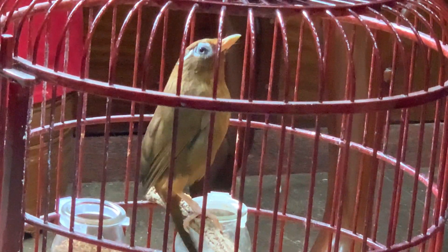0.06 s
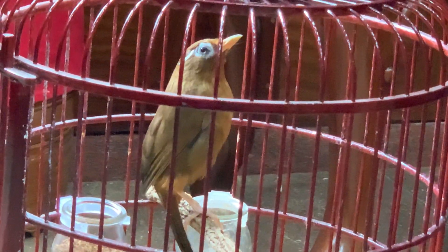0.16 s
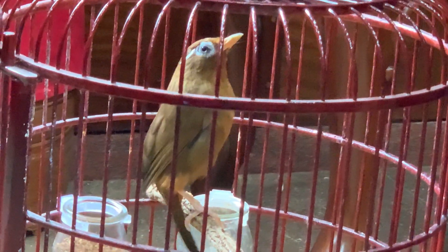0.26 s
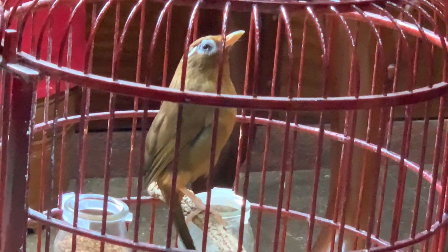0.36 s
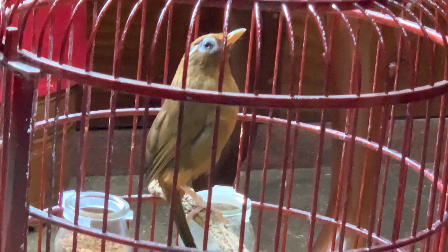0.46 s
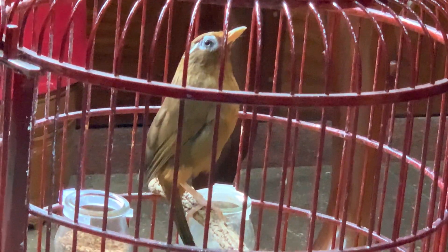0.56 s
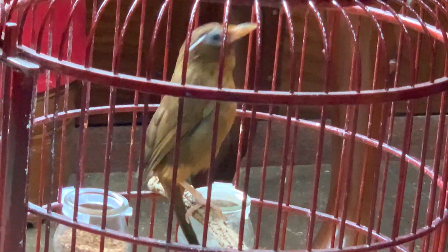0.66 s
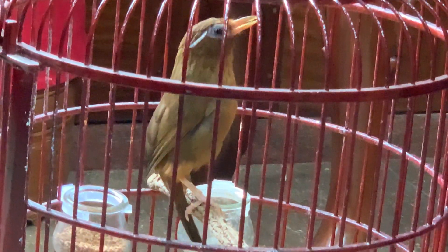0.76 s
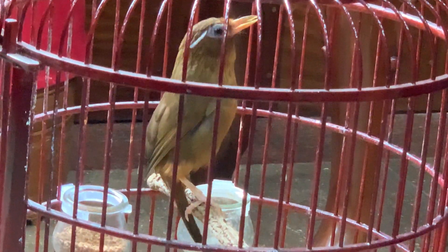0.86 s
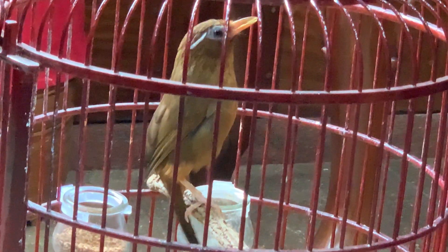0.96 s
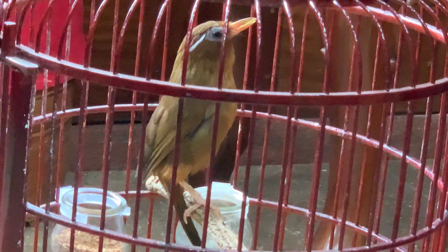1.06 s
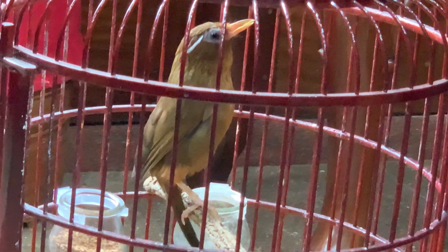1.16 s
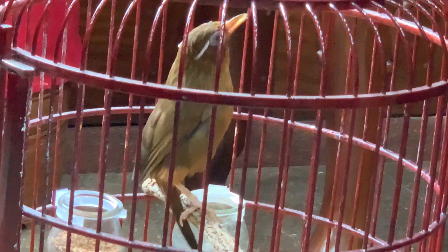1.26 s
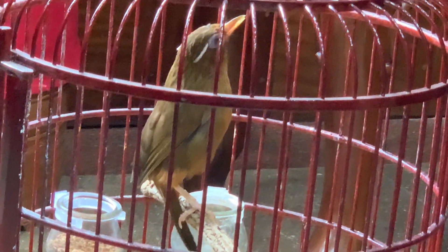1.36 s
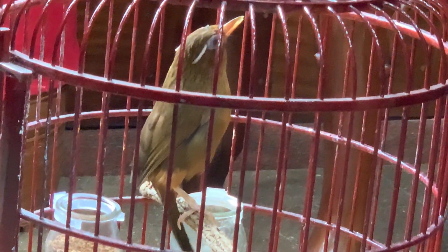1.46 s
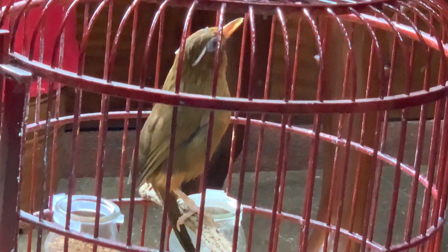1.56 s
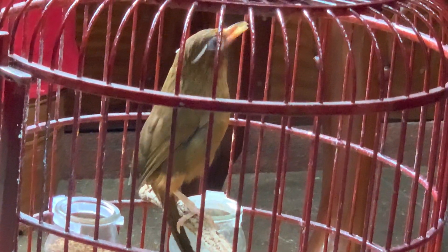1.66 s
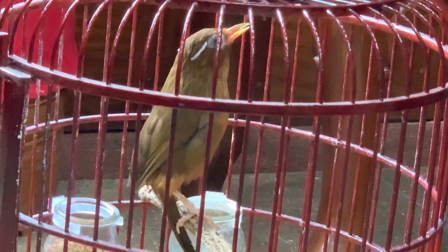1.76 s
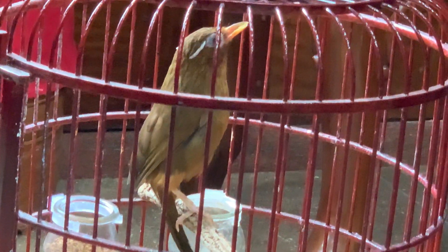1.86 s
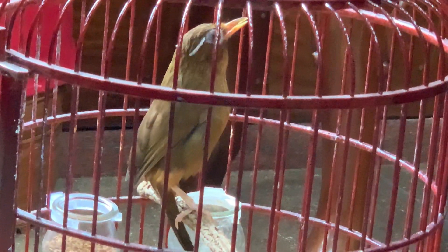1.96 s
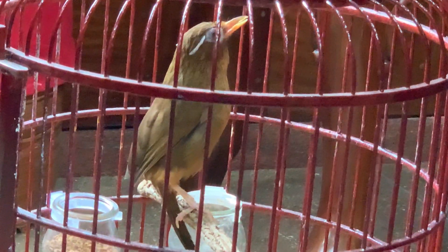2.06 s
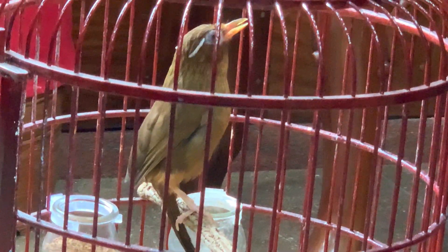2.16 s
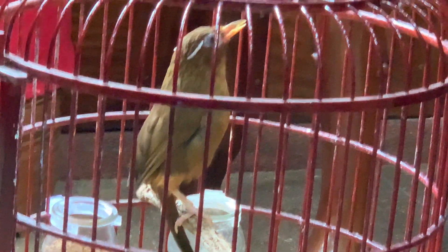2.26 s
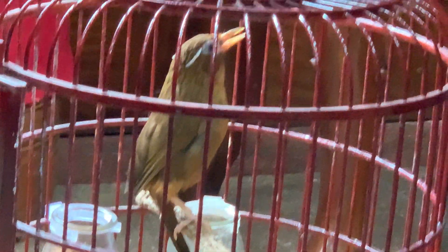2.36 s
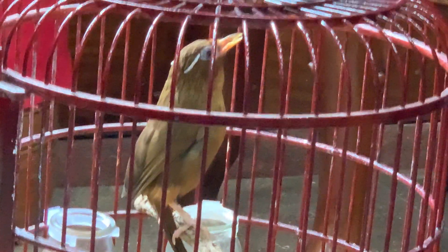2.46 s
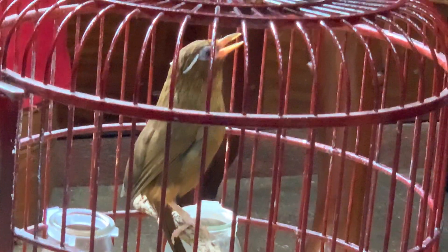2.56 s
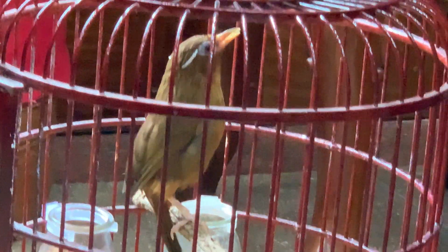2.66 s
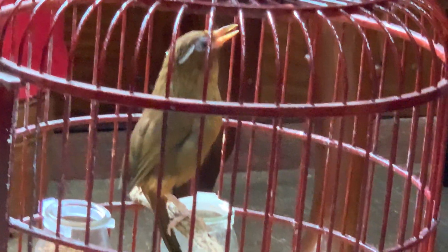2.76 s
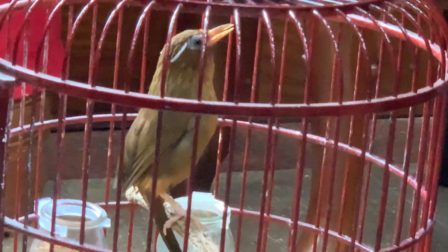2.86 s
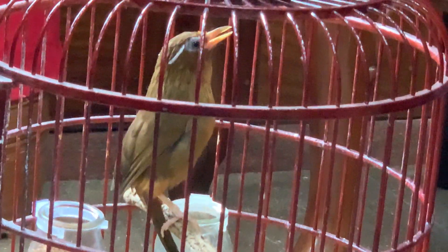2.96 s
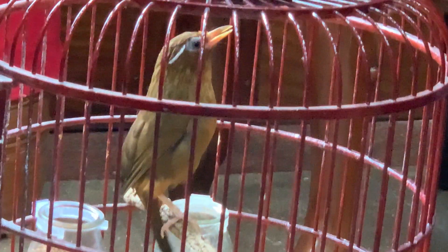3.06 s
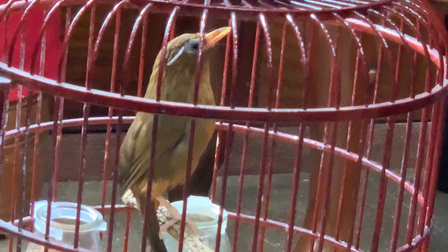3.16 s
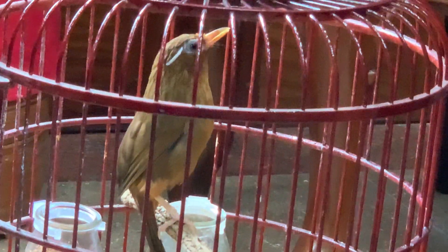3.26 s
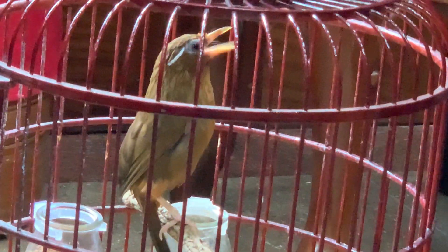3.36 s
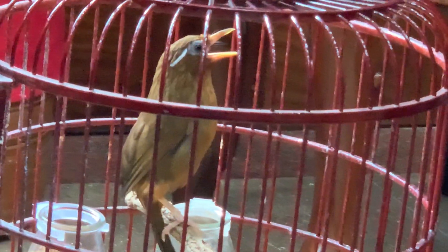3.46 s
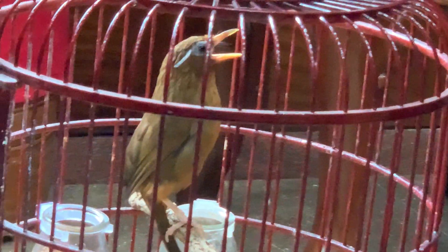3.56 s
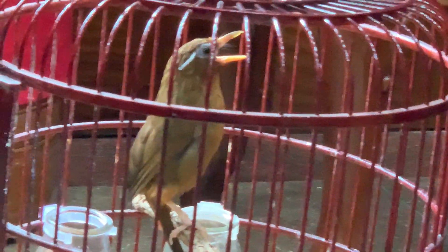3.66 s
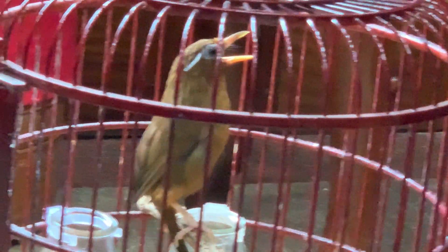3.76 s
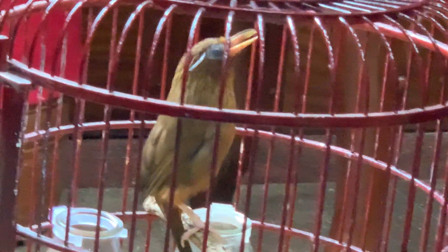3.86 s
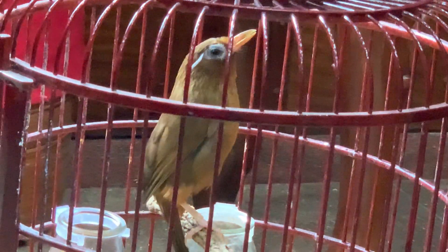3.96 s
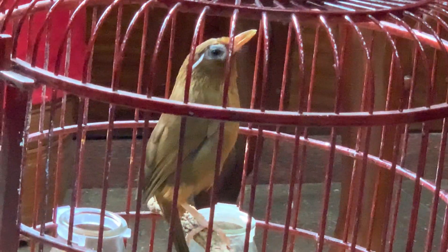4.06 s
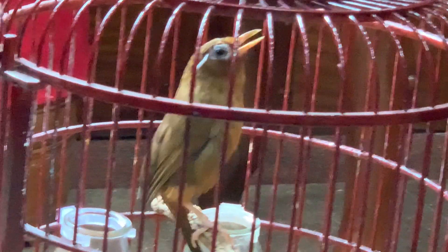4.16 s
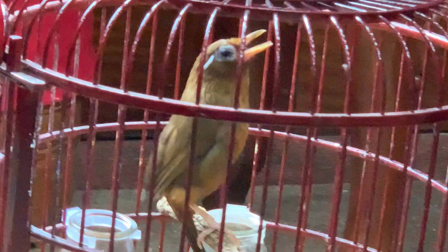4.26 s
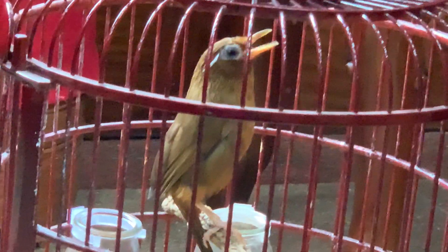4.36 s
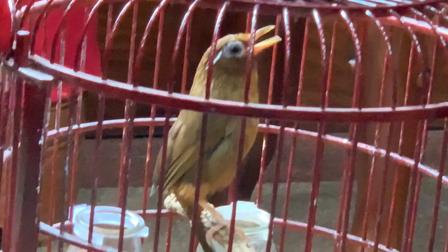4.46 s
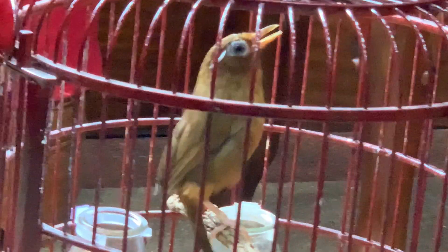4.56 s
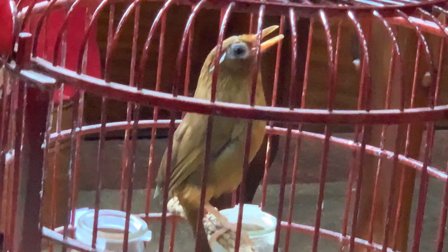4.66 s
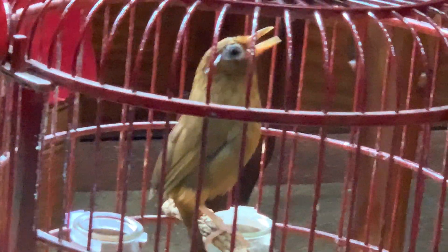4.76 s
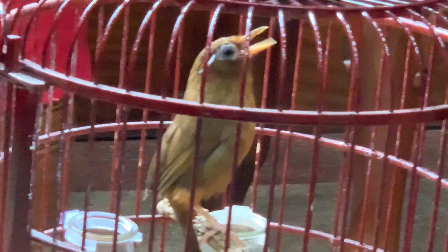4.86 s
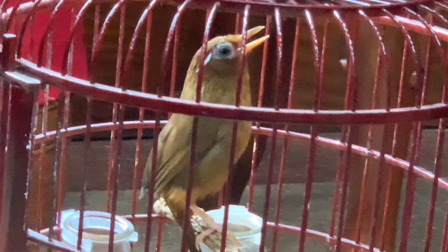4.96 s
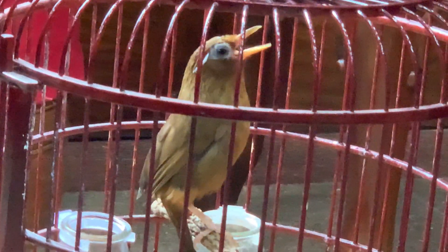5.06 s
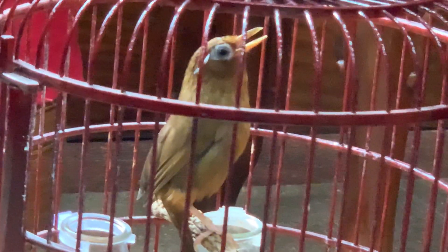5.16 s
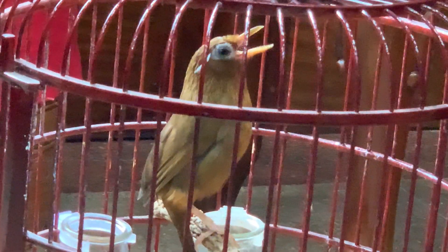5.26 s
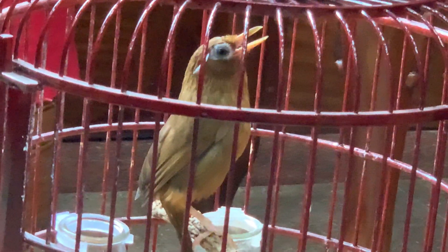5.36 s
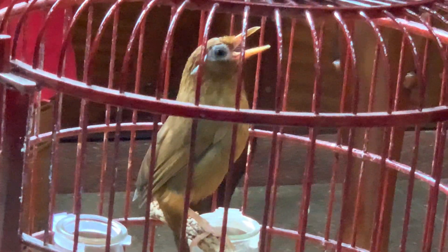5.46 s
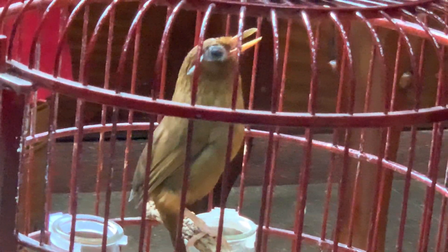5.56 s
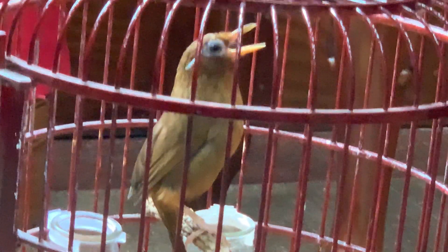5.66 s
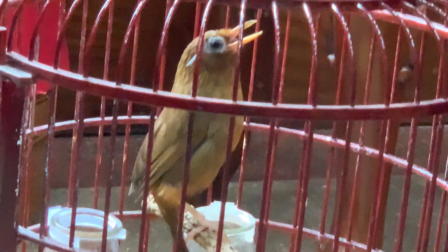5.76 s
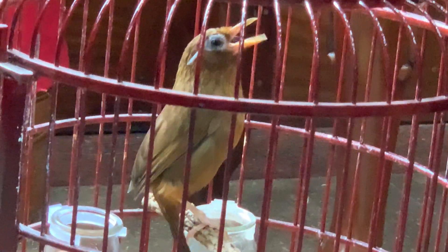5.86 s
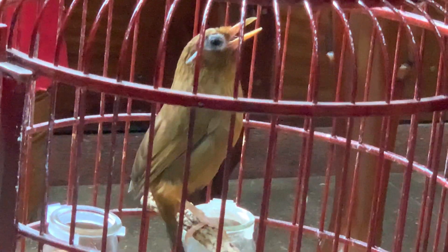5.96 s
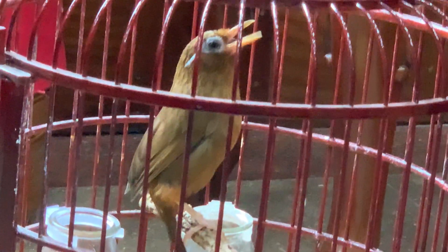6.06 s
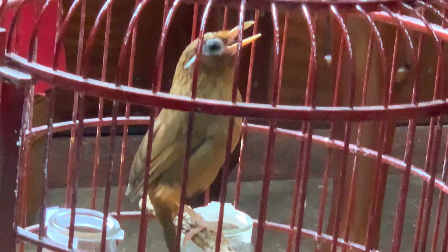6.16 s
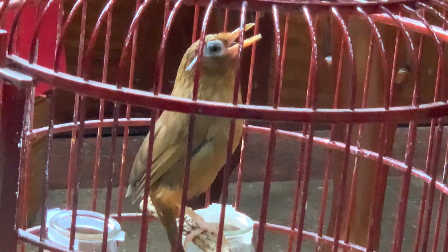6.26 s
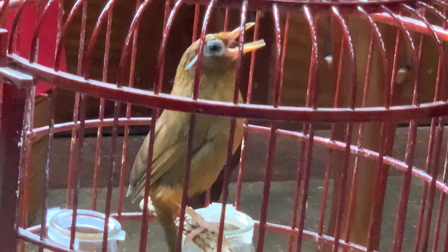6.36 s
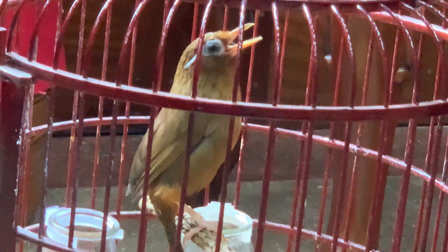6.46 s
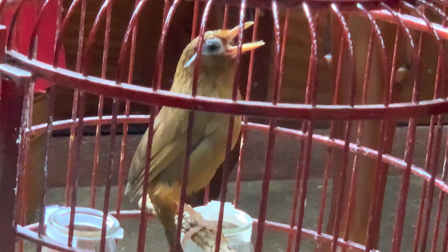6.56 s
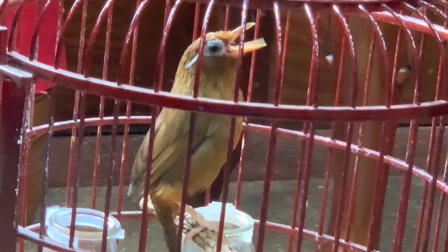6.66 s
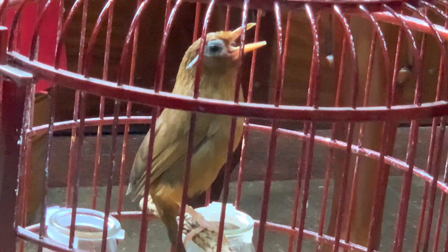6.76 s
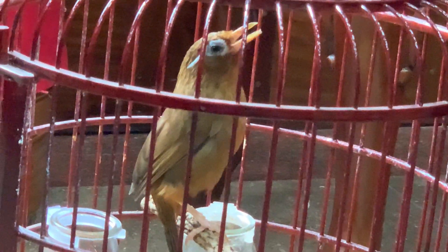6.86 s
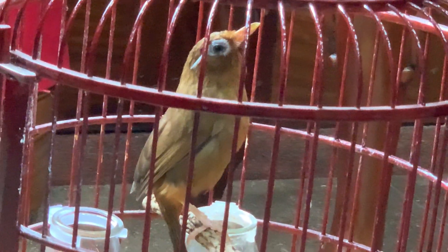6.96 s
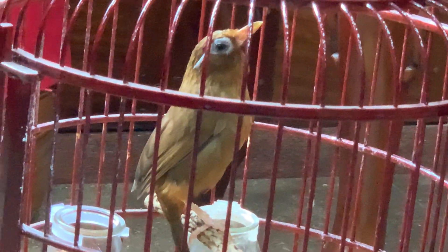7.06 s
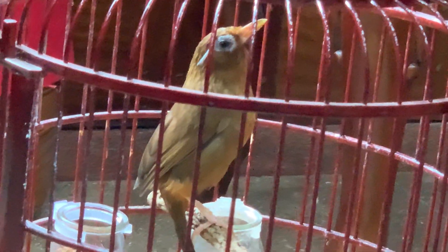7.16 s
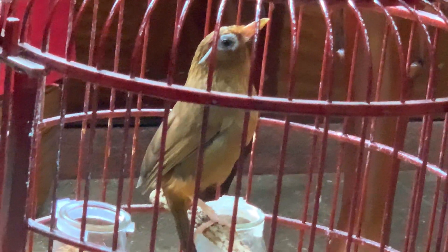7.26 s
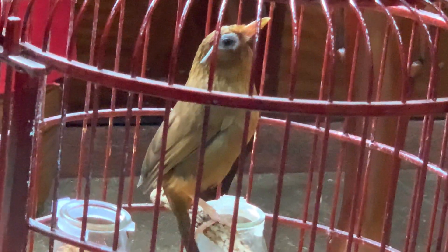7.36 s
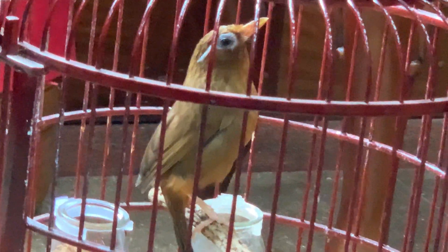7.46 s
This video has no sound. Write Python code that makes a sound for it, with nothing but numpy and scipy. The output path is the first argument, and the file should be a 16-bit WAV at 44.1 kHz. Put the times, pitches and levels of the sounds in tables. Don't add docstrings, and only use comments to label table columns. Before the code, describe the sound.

Quiet, mellow bird whistles come first over a faint distant hum and low wind bumps on the microphone. Wavering rasps grow, a steep upward sweep leads to loud, shrill trills, and a fast string of rough low buzzes answers. The song then settles into evenly repeated high calls, each tumbling down, with lower falling whistles from another bird a few metres away. Hard porch walls smear every note.

```python
import sys
import numpy as np
from scipy import signal
from scipy.fft import rfft, irfft
from scipy.io import wavfile
from scipy.ndimage import uniform_filter1d, minimum_filter1d, map_coordinates

SR = 44100
rng = np.random.default_rng(int(sys.argv[2]) if len(sys.argv) > 2 else 0)


def elevation(decibels):
    levels = np.asarray(decibels, float)
    return 10 ** (levels / 20)


def to_wav(sig):
    pcm = np.clip(np.atleast_2d(sig), -1, 1) * 32767
    pcm = np.round(pcm).astype(np.int16)
    wavfile.write(sys.argv[1], SR, pcm.T)


N = 330750

# freq_hz, density_db
HUM_SPECTRUM = [(30, -14), (100, -18.5), (250, 1), (420, -0.5), (800, -7.5), (1300, -7.5), (2500, -7),
                (4000, -19), (5500, -32), (10000, -30), (15000, -31)]
# time_s, level_db
HUM_SWELL = [(0.0, -54.5), (2.21, -51.5), (2.65, -51), (4.471, -49), (4.6, -50.5), (4.719, -49.5),
             (4.991, -51), (5.99, -48), (6.412, -49.5), (7.5, -47.5)]
# freq_hz, density_db
GUST_SPECTRUM = [(25, -46), (55, 7.5), (110, 0.5), (200, -9), (350, -31), (700, -40), (1500, -99)]
# freq_hz, density_db
SLAP_SPECTRUM = [(60, -33), (150, 7), (300, 0), (500, -13), (900, -27.5), (1800, -97)]
# start_s, hold_s, level_db
GUSTS = [(0, 0.18, -47), (.45, 0.026, -56), (0.668, 0.17, -35.5), (0.982, 0.1, -42), (1.196, 0.097, -47),
         (1.684, 0.011, -48.5), (1.836, 0.051, -38.5), (1.988, 0.012, -37.5), (2.12, 0.093, -40),
         (2.355, 0.0086, -40), (2.495, 0.046, -47.5), (2.633, 0.0096, -49), (3.164, 0.017, -35),
         (3.265, 0.053, -38.5), (3.487, 0.17, -52), (3.72, 0.015, -49), (4.024, 0.0082, -45),
         (4.188, 0.019, -46), (4.45, 0.052, -30.5), (4.579, 0.018, -32), (4.685, 0.018, -29),
         (4.868, 0.095, -43), (5.202, 0.062, -46), (5.313, 0.024, -37.5), (5.428, 0.032, -38),
         (5.668, 0.019, -46.5), (6.117, 0.019, -52), (6.312, 0.048, -54), (6.556, .01, -51)]
# freq_hz, t60_s, level_db, share common to both ports (0-1)
PORCH_BANDS = [(700, 0.67, 9, 0.9), (1300, 0.64, 2.5, 0), (2400, 1, 6.5, 0.17), (3800, 0.95, 5.5, 0.44),
               (5650, 0.59, 1, 0.12), (9400, 0.81, 2, 0.29), (14900, 0.4, 7.5, 0.67)]
# freq_hz, gain_db
TREBLE_COLOUR = [(11300, 1), (11750, -11), (12050, -48), (12400, 6), (14400, -6.5), (14900, -27),
                 (15700, -15)]
SHAKE = dict(rasp=(.09, .075), trill=(.04, .04), arch=(.012, .012), slide=(.045, .04), tumble=(.018, .018),
         lift=(.07, .015), chirp=(.08, .08), held=(.011, .011), scoop=(.08, .007), buzz=(.08, .03),
         fall=(.02, .02), peep=(.035, .02), phrase=(.01, .007))

NEIGHBOUR_OVERTONES_DB = [4.5, -1, -2, -26, -25, -74, 0, -12.5, -34, 4]
# time_s, pitch_hz, fundamental_db, second_partial_db
PHRASE = [
    (0, 1575, -39, -34),
    (.02, 1545, -35, -26),
    (.062, 1490, -35, -29),
    (.074, 1400, -38, -44),
    (.084, 1290, -44, -18),
    (.1, 1160, -56, -21),
    (0.137, 965, -57, -33),
]
# start_s, stretch (ratio), pitch (ratio), level_db
REPEATS = [
    (4.995, 0.76, 0.98, -13),
    (5.175, 0.92, 0.99, -11),
    (5.375, 0.96, 1.002, -10.5),
    (5.579, 0.98, 1.01, -11.5),
    (5.803, 0.99, 1.01, -9.5),
    (6.03, 0.95, 1.0, -10),
    (6.255, 0.99, 1.02, -10),
    (6.487, 0.93, 1.02, -10.5),
]
# time (share of length), pitch (ratio), fundamental_db, second_partial_db
SCOOP_SHAPE = [(0, .65, -12, -1.5), (.15, .77, -12.5, 9), (.42, 0.96, -3, -14), (.6, .99, 1, -5),
               (1, 0.97, -2, -3)]
BUZZ_SHAPE = [(0, 0.8, -42, -6.5), (.5, .92, -36, -6.5), (.78, 1, -44, 0), (1, 0.98, -31, -5)]
DROP_SHAPE = [(0, 1.5, -14, -39), (.07, 1.42, 1.5, -35), (.15, 1.03, -0.5, -26), (.6, .96, -3.5, -33),
              (1, .94, -4, -24)]
# start_s, length_s, pitch_hz, level_db, bend depth (exponent)
SCOOPS = [
    (2.0, 0.21, 1480, -43, 0.79),
    (2.41, 0.21, 1457, -46, 0.8),
    (2.799, 0.28, 1491, -45.5, 0.99),
]
BUZZES = [
    (4.181, 0.068, 1223, -27.5, 0.91),
    (4.26, 0.087, 1276, -31, .8),
    (4.384, 0.057, 1205, -28.5, 0.17),
    (4.45, .12, 1191, -32.5, 0.63),
    (4.6, 0.084, 1181, -31.5, 0.45),
    (4.715, 0.09, 1254, -31, 0.14),
    (4.82, .09, 1222, -30.5, 0.45),
    (4.899, 0.08, 1471, -31, 0.27),
    (4.94, 0.099, 1306, -31.5, 0.42),
]
DROPS = [
    (7.0, .18, 1248, -36.5, 0.93),
    (7.195, 0.049, 1197, -37, 0.31),
    (7.365, 0.0602, 1170, -42, 0.95),
]
# start_s, length_s, start_hz, end_hz, level_db
FALLS = [
    (6.73, 0.13, 1912, 1191, -30),
    (7.31, 0.099, 1587, 1500, -43.5),
    (7.425, 0.067, 1590, 1288, -32.5),
]

SOFT_OVERTONES_DB = [-16.5, -23.5, -27, -25, -23.5, -49, -17.5, -20.5]
# time (share of length), pitch (ratio), fundamental_db, second_partial_db
LIFT_SHAPE = [(0, .73, -3, -23), (.22, .77, -21, -8.5), (.4, 0.99, -10, -18.5), (.54, 1, -3, -11.5),
              (.85, 0.96, -4, -24), (1, 0.99, -6, -9)]
CHIRP_SHAPE = [(0, 0.8, -16, -16), (.2, .76, -18, -2), (.3, .8, -14, -1), (.52, 1, -6, -7.5),
               (1, 0.98, -12, -34)]
# start_s, length_s, pitch_hz, level_db, bend depth (exponent)
LIFTS = [
    (0.267, 0.3, 1737, -42.5, 1.01),
    (0.709, .27, 1634, -40, 0.93),
]
CHIRPS = [
    (1.09, 0.14, 1300, -46, 1.05),
    (1.53, 0.17, 1277, -46, .95),
]
# start_s, length_s, pitch_hz, fundamental_db, second_partial_db
HELD = [
    (0, 0.17, 1887, -43, -66),
    (0.219, 0.036, 1006, -44, -61),
    (0.478, 0.029, 1083, -39.5, -77),
    (1.06, 0.086, 1503, -54, -49.5),
    (1.3, 0.053, 1497, -44, -53),
    (1.372, 0.054, 1489, -36.5, -48.5),
    (1.75, 0.068, 1480, -41, -51),
]
# start_s, length_s, start_hz, end_hz, level_db
PEEPS = [
    (.1, 0.051, 1032, 1320, -59),
    (.43, 0.028, 1160, 1354, -47.5),
    (.66, 0.045, 1844, 1895, -54.5),
    (1.68, 0.08, 1583, 1942, -45),
]
OPEN_OVERTONES_DB = [-12.5, -7.5, -11.5, -12.5, -15]
# time (share of length), pitch (share of top), level_db, overtone_db
RASP_SHAPE = [(0, .63, -3, -19.5), (.25, 0.93, -1, -5), (.6, 0.97, -3, -10.5), (.8, .74, -6.5, -5),
              (1, 0.67, -6, 4)]
TRILL_SHAPE = [(0, .87, -10, -6), (.35, 0.97, 0.5, -14), (.8, .84, -9.5, -13.5), (1, 0.75, -10, -31)]
ARCH_SHAPE = [(0, .79, -5, -12.5), (.25, .93, -5.5, -11.5), (.43, 0.99, -2.5, -12), (.75, 0.995, -7, -15.5),
              (1, 0.9, -4.5, -16)]
# start_s, length_s, second_partial_top_hz, level_db, bend depth (exponent)
RASPS = [
    (1.969, 0.22, 3892, -41, 0.98),
    (2.318, .22, 3800, -39, 0.95),
    (2.666, 0.23, 3800, -37.5, 0.91),
    (3.037, 0.2, 4295, -37.5, 1),
]
TRILLS = [
    (3.56, 0.093, 4825, -25, 1.09),
    (3.67, 0.15, 5037, -26.5, 1.5),
    (3.81, 0.1, 4447, -27.5, .7),
]
ARCHES = [
    (5.31, 0.18, 4677, -28.5, 0.89),
    (5.611, 0.18, 4670, -28.5, 1.14),
    (5.9, 0.16, 4865, -26, 0.88),
    (6.184, 0.14, 4850, -26, 0.83),
    (6.482, 0.11, 4817, -29, .76),
    (6.778, 0.11, 4762, -25, .82),
    (7.077, 0.11, 4815, -28.5, 0.93),
]
# start_s, length_s, start_hz, end_hz, level_db
SLIDES = [
    (3.395, 0.13, 1776, 4010, -31.5),
    (3.485, 0.087, 4020, 4167, -30),
    (3.93, 0.15, 2847, 4090, -33),
    (5.28, 0.039, 3900, 3740, -35),
]
# start_s, length_s, start_hz, end_hz, level_db
TUMBLES = [
    (4.07, 0.095, 4050, 3185, -36),
    (4.315, 0.11, 3800, 2400, -38),
    (5.07, 0.15, 4100, 3470, -49.5),
    (5.48, 0.041, 4530, 3200, -36.5),
    (5.755, .07, 3870, 3340, -37.5),
    (6.03, 0.071, 4700, 3560, -38),
    (6.315, .06, 4690, 3880, -33.5),
    (6.59, 0.055, 4690, 3730, -35.5),
    (6.878, .06, 4690, 3790, -35.5),
    (7.185, 0.053, 4510, 3160, -35.5),
]
# start_s, length_s, start_hz, end_hz, level_db
SIDE_WHISTLES = [(0, 0.039, 3955, 2400, -60), (0.046, 0.057, 3760, 3810, -64.5),
                 (.61, 0.046, 2540, 2530, -65), (1.75, 0.0337, 1883, 2400, -46),
                 (2.128, 0.095, 2520, 2800, -48.5), (2.439, 0.089, 2230, 2340, -46),
                 (1.74, .1, 2715, 3100, -55.5), (2.83, 0.077, 2260, 2400, -41.5),
                 (3.07, 0.047, 3270, 3250, -44), (0.104, 0.022, 1936, 2400, -50),
                 (0.266, 0.072, 2400, 2940, -52.5), (0.663, 0.043, 3620, 4470, -60.5),
                 (0.686, 0.037, 2026, 1170, -52), (1.111, 0.068, 1292, 2630, -67),
                 (1.15, 0.063, 1410, 1877, -47), (1.58, 0.076, 1110, 1950, -47),
                 (1.995, 0.1, 1553, 2130, -44.5), (2.506, 0.054, 2280, 1830, -57),
                 (2.416, 0.051, 1676, 2070, -47), (3.048, 0.036, 1896, 2780, -46),
                 (6.236, 0.054, 5110, 5100, -35), (6.495, 0.055, 5070, 5250, -37),
                 (6.799, 0.058, 5140, 5210, -36.5), (7.106, 0.041, 5040, 5050, -35),
                 (7.028, 0.21, 1764, 1620, -53), (7.376, 0.032, 1586, 970, -42.5)]

SIDES = np.array([[1], [-1]])


def wobble(rate_hz, size):
    k = max(int(SR / rate_hz), 2)
    steps = np.repeat(rng.standard_normal(size // k + 1), k)
    return 1.353 * uniform_filter1d(uniform_filter1d(steps, k), k)[:size]


def coloured(points, size):
    hz, db = np.transpose(points)
    shape = elevation(np.interp(np.log(np.fft.rfftfreq(size, 1 / SR) + 1), np.log(hz), db))
    noise = irfft(rfft(rng.standard_normal(size)) * shape, size)
    return noise / noise.std()


def hum():
    wide = [(hz, db + np.clip(8 * np.log2(hz / 900), -12, 0)) for hz, db in HUM_SPECTRUM]
    s, db = np.transpose(HUM_SWELL)
    swell = elevation(np.interp(np.arange(N) / SR, s, db) + 0.5 + 0.54 * wobble(2.8, N))
    return swell * (coloured(HUM_SPECTRUM, N) + 0.76 * coloured(wide, N) * SIDES)


def breeze():
    rise_db_s, fall_db_s, calm_db = 374, 183, -59
    t = np.arange(N) / SR
    db = np.full(N, float(calm_db))
    for s, hold, top_db in GUSTS:
        rise = rise_db_s * np.maximum(s - t, 0)
        fall = fall_db_s * np.maximum(t - s - hold, 0)
        db = np.maximum(db, top_db - rise - fall)
    thump_gain = elevation(db + 0.87 * wobble(14, N))
    slap_gain = elevation(-50.5 + 1.96 * (db + 38.5) + 3.9 * wobble(30, N))
    thump = coloured(GUST_SPECTRUM, N) + 0.29 * coloured(GUST_SPECTRUM, N) * SIDES
    slap = coloured(SLAP_SPECTRUM, N) + 0.16 * coloured(SLAP_SPECTRUM, N) * SIDES
    return thump_gain * thump + slap_gain * slap


def porch(song, direct_db, lag_s, pan_db, early_s=0.015, early_db=2.0):
    t = np.arange(SR) / SR
    octaves = np.log2(np.fft.rfftfreq(SR, 1 / SR) + 1)
    centres = np.log2(np.array(PORCH_BANDS)[:, 0])
    common, *own = rfft(rng.standard_normal((3, SR)))
    tails = np.zeros((2, SR))
    for k, (hz, t60, db, share) in enumerate(PORCH_BANDS):
        band = np.interp(octaves, centres, np.arange(len(PORCH_BANDS)) == k)
        share = np.clip(share, 0, 1)
        noise = irfft(band * (np.sqrt(share) * common + np.sqrt(1 - share) * np.array(own)), SR)
        tails += elevation(db - 60 * t / t60) * noise
    tails *= (1 + elevation(early_db) * np.exp(-t / early_s)) * np.clip(t / 0.00094, 0, 1)
    tails /= np.sqrt(np.sum(tails ** 2) / 2)
    sway_s = 4e-5
    swayed = map_coordinates(song, [np.arange(N) + sway_s * SR * wobble(45, N)], mode="nearest")
    side = SIDES / 2
    size = N + SR
    lag = np.exp(-2j * np.pi * np.fft.rfftfreq(size, 1 / SR) * (side * lag_s))
    direct = elevation(direct_db) * rfft(song, size)
    echoes = rfft(swayed, size) * rfft(tails, size)
    return elevation(side * pan_db) * irfft((direct + echoes) * lag, size)[:, :N]


def shaped(shape, rows):
    share, bend, *db = np.transpose(shape)
    return [np.transpose([s + length * share, hz * bend ** depth, *(np.array(db) + level)])
            for s, length, hz, level, depth in rows]


def slid(rows, first_db, second_db, onset_db=4):
    u = np.arange(8) / 7
    left = (1 - u) ** 1.7
    return [np.transpose([s + length * u, end + (hz - end) * left,
                          *(db + onset_db * left + [[first_db], [second_db]])])
            for s, length, hz, end, db in rows]


def shaken(**families):
    notes = [note for family in families.values() for note in family]
    shakes = [SHAKE[name] for name, family in families.items() for note in family]
    return notes, shakes


def spread(note):
    s, *columns = np.transpose(note)
    t = np.arange(s[0], s[-1], 1 / SR)
    return s[0], *(np.interp(t, s, c) for c in columns)


def unsteadiness(hz, shake):
    return np.interp(hz, [hz.min(), hz.max() + 1], shake)


def add(track, start_s, hz, partials_db, shake):
    start = int(start_s * SR)
    size = min(len(hz), N - start)
    trill = np.sin(2 * np.pi * np.cumsum(75 + 25 * wobble(60, size)) / SR) + .3 * wobble(200, size)
    hz = uniform_filter1d(hz[:size], 400, mode="nearest") * (1 + shake[:size] * trill)
    phase = 2 * np.pi * np.cumsum(hz) / SR
    t = np.arange(size) / SR
    edges = np.clip(np.minimum(t, t[::-1]) / .008, 0, 1) ** 2
    swell = edges * elevation(3.0 * wobble(116.3, size))
    for k, db in enumerate(partials_db, 1):
        grain = .7 * (k > 2) * wobble(500, size)
        audible = k * hz < .35 * SR
        track[start:][:size] += np.sqrt(2) * swell * elevation(db)[:size] * audible * np.sin(k * phase + grain)


def sing(track, notes, shakes, overtones_db):
    shut_beak_db = -13
    for (start, hz, first_db, second_db), shake in zip(map(spread, notes), shakes):
        top_db = np.maximum(first_db + shut_beak_db, second_db)
        partials = [first_db, second_db] + [top_db + db for db in overtones_db]
        add(track, start, hz, partials, unsteadiness(hz, shake))
    return track


def neighbour():
    repeats = [np.array(PHRASE) * [stretch, pitch, 1, 1] + [s, 0, db, db] for s, stretch, pitch, db in REPEATS]
    fundamental_db = -26 - 13
    notes = shaken(scoop=shaped(SCOOP_SHAPE, SCOOPS), buzz=shaped(BUZZ_SHAPE, BUZZES),
                   peep=shaped(DROP_SHAPE, DROPS), fall=slid(FALLS, fundamental_db, 0, -5), phrase=repeats)
    return sing(np.zeros(N), *notes, np.array(NEIGHBOUR_OVERTONES_DB) - 27.5)


def sing_beak_shut(song):
    fade_db = -15
    held = [[(s, hz, a, b), (s + length, hz, a + fade_db, b + fade_db)] for s, length, hz, a, b in HELD]
    notes = shaken(lift=shaped(LIFT_SHAPE, LIFTS), chirp=shaped(CHIRP_SHAPE, CHIRPS),
                   held=held, peep=slid(PEEPS, 0, -18))
    sing(song, *notes, SOFT_OVERTONES_DB)


def sing_beak_open(song):
    overtone_db = -9
    notes, shakes = shaken(rasp=shaped(RASP_SHAPE, RASPS), trill=shaped(TRILL_SHAPE, TRILLS),
                           arch=shaped(ARCH_SHAPE, ARCHES), slide=slid(SLIDES, 0, overtone_db, -14),
                           tumble=slid(TUMBLES, 0, overtone_db, -3))
    for (start, hz, db, top_db), shake in zip(map(spread, notes), shakes):
        partials = [db - 33.0, db] + [top_db + d for d in OPEN_OVERTONES_DB]
        add(song, start, hz / 2, partials, unsteadiness(hz, shake))


def whistle_aside(song):
    for start, length, hz, end_hz, db in SIDE_WHISTLES:
        glide = np.linspace(hz, end_hz, int(length * SR))
        add(song, start, glide, [np.full(len(glide), db)], np.full(len(glide), 0.033))


def near_bird():
    song = np.zeros(N)
    sing_beak_shut(song)
    sing_beak_open(song)
    whistle_aside(song)
    return song


def scene():
    far = elevation(6.0) * porch(neighbour(), direct_db=-5, lag_s=-0.000092, pan_db=1.0)
    near = elevation(8.5) * porch(near_bird(), direct_db=-11.5, lag_s=6e-5, pan_db=-0.12)
    return hum() + breeze() + far + near


def top_cut(x):
    return signal.sosfilt(signal.butter(12, 15710, fs=SR, output="sos"), x)


def record(dry):
    masked_db, patchy_share, patchy_from_bin = -24, .64, 150
    hz, db = np.transpose(TREBLE_COLOUR)
    dry = irfft(rfft(dry) * elevation(np.interp(np.fft.rfftfreq(N, 1 / SR), hz, db)), N)
    dry = np.tanh(2 * dry) / 2
    frames = signal.stft(dry, nperseg=1024)[2]
    power = uniform_filter1d(np.sum(np.abs(frames) ** 2, axis=0), size=2, axis=1)
    band = np.repeat(power[:512].reshape(64, 8, -1).mean(axis=1), 8, axis=0)
    masker = uniform_filter1d(power, size=120, axis=0)[:512]
    frames[:, 32:512] *= np.where(band < elevation(2 * masked_db) * masker, .02, 1)[32:]
    weak = uniform_filter1d(power, size=5, axis=0) < patchy_share * uniform_filter1d(power, size=32, axis=0)
    patches = np.where(minimum_filter1d(weak, size=3, axis=1), .02, 1)
    frames[:, patchy_from_bin:] *= patches[patchy_from_bin:]
    mix = signal.istft(frames, nperseg=1024)[1][:, :N]
    return top_cut(mix)


dry = scene()
out = record(dry)
to_wav(out)
```